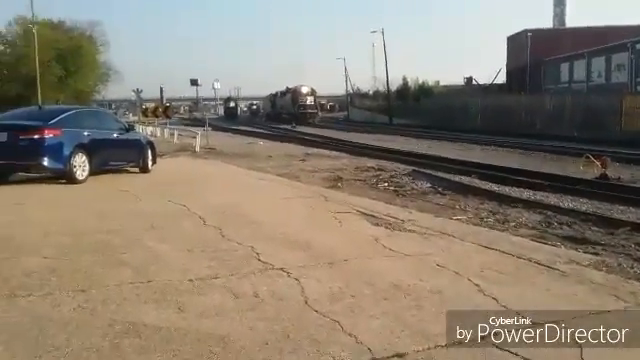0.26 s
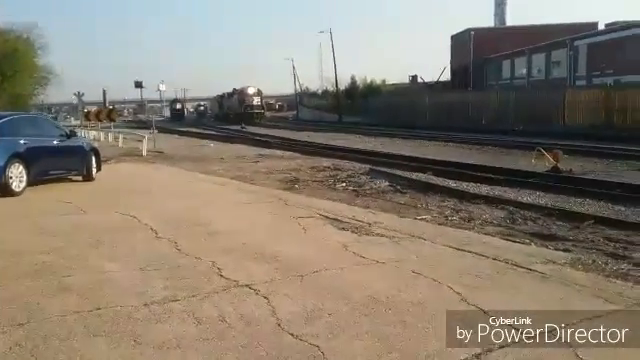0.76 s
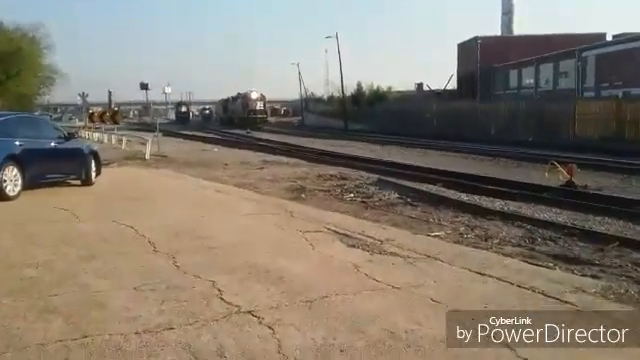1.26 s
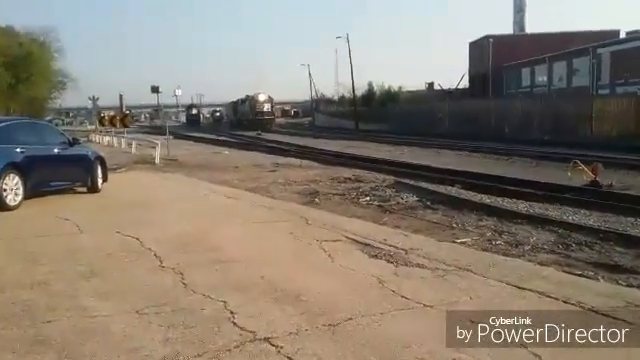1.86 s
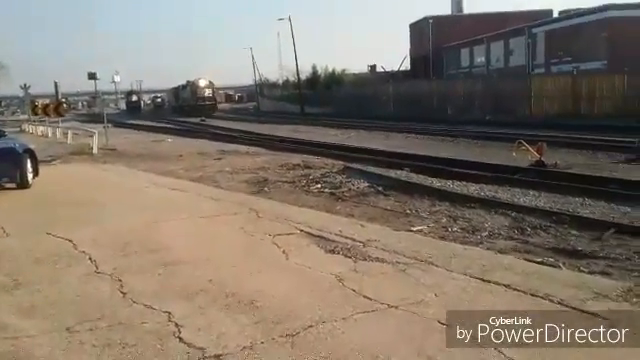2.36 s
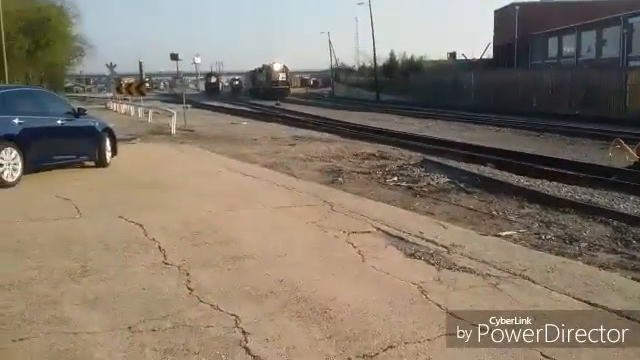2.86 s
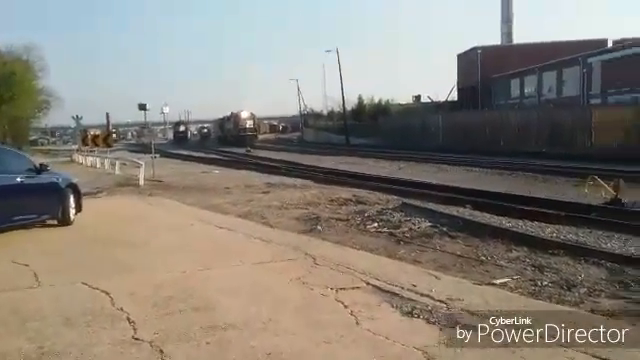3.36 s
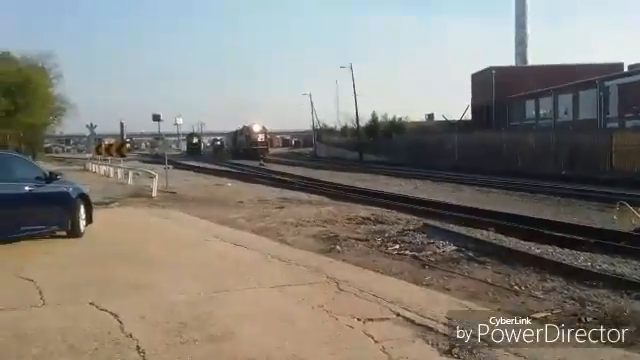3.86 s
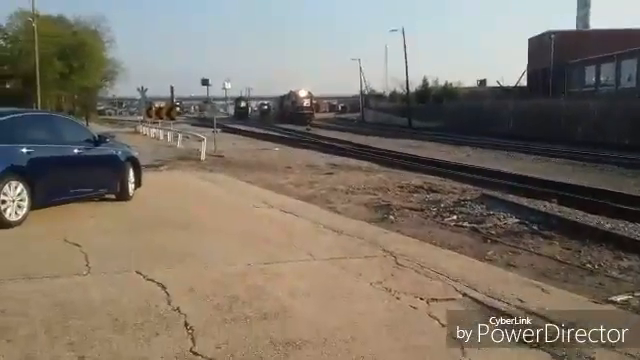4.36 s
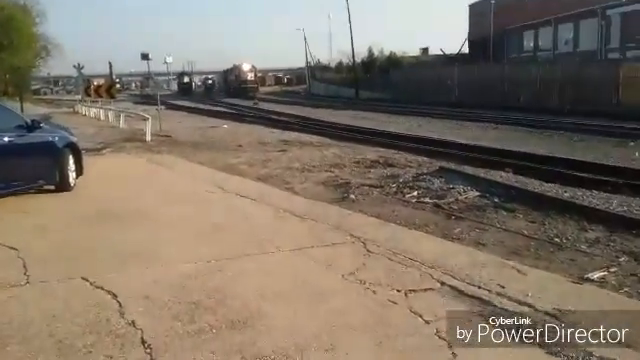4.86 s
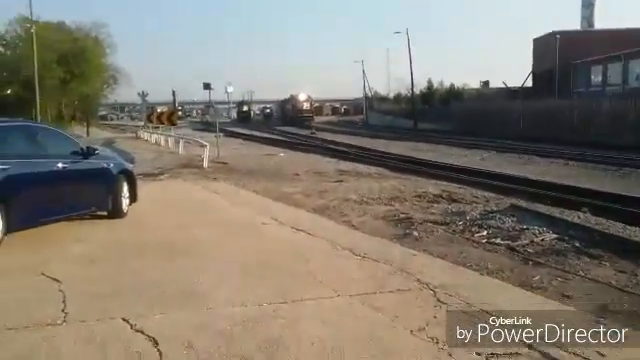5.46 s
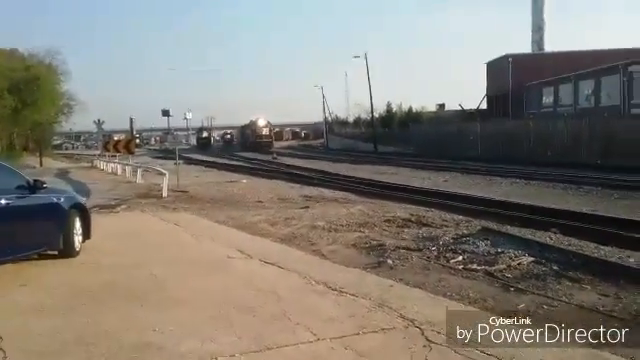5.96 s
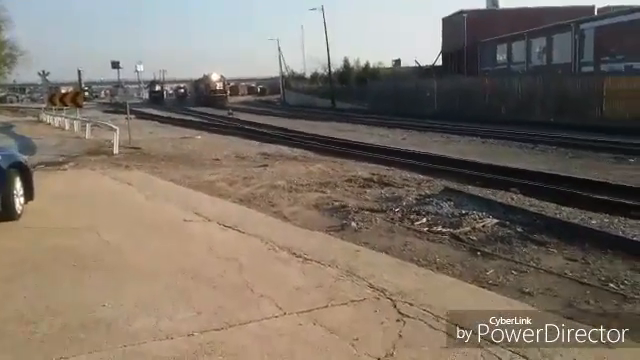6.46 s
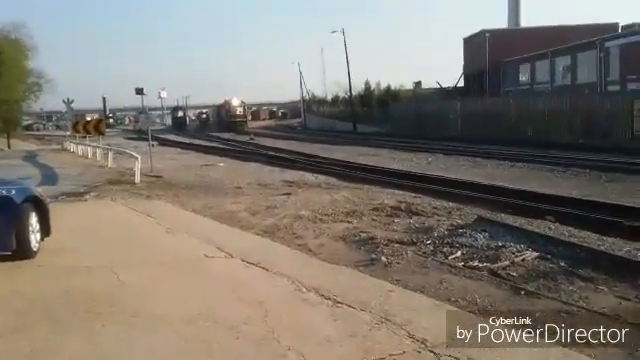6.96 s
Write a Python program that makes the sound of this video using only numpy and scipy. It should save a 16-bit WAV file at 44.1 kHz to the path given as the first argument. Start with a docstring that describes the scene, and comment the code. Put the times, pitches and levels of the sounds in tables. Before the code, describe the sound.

Diesel locomotives idle some way off in an open rail yard, a low drone with a slow throb, a soft fan roar and thin high whining tones that drift on the breeze. A faint wheel squeal dies away at the start. Close by, wind rumbles and slaps at a small microphone, hardest in the first two seconds, then in lighter scattered gusts as the engines carry on.

```python
"""An open rail yard in a light wind, with diesel locomotives idling some way off.
Two neighbouring exhaust tones beat into a slow throb. Turbochargers whistle, a blower and gears whine,
and fans roar, their treble coming and going on the breeze. Close by, gusts rumble and eddies slap
at the port of a small microphone. A faint wheel squeal dies away at the start."""
import sys
import numpy as np
from scipy import signal
from scipy.io import wavfile

SR = 44100
rng = np.random.default_rng(int(sys.argv[2]) if len(sys.argv) > 2 else 0)


def file_out(sig):
    """Save sig as 16-bit WAV at sys.argv[1]."""
    # one column per channel
    cols = np.atleast_2d(sig).T
    # limit, then scale
    lim = np.clip(cols, -1, 1)
    pcm = np.round(lim * 32767).astype(np.int16)
    wavfile.write(sys.argv[1], SR, pcm)


N = 318402
TIME = np.arange(N) / SR
CRANK_HZ = 8.392   # crankshaft turns per second


# The exhaust boom, fading in and out through the moving air.
# Each row: time in seconds, level in dB of the tone at 8 times the crank rate, and of the one at 9 times.
BOOM_LEVELS = [(0.0, -14.5, -32.0), (0.6, -14.0, -27.5), (1.05, -17.7, -23), (1.75, -36, -21.3),
               (2.4, -19.3, -23.2), (3.15, -14.7, -21.6), (3.85, -15.9, -22.6), (4.7, -24.2, -25.5),
               (5.05, -22.4, -28.5), (5.8, -18.4, -23.7), (6.3, -19.8, -20), (6.65, -23, -21.5),
               (7.22, -24, -23)]
# The weaker tones that fill out the drone. Each row: multiple of the crank rate, level in dB.
DRONE_TONES = [(7, -36.5), (10, -35), (11, -28), (15, -40), (16, -39), (18, -41), (20, -32.5), (21, -36.5),
               (22, -30), (23, -42), (24, -32.5)]
# Their shared swell. Each row: time in seconds, gain in dB.
DRONE_SWELL = [(0, 1), (1.2, 1), (2.4, 1), (3.5, -0.5), (4.4, 0.5), (5.2, -1), (5.8, -6.5), (6.5, 0),
               (7.22, -4.5)]

def engine(throb_at_s=0.068, silencer_hz=88, hunt_rad=0.02, waver_rad=0.3, fade_db=2.0):
    """Exhaust tones at multiples of the crank rate; the eighth and ninth beat once a turn."""
    # the crank hunts a little, moving all the tones together
    crank = 2 * np.pi * CRANK_HZ * (TIME - throb_at_s) + hunt_rad * drift(0.6)
    eighth_db, ninth_db = curves(BOOM_LEVELS)
    drone_db, = curves(DRONE_SWELL)
    exhaust = from_db(eighth_db) * np.cos(8 * crank) + from_db(ninth_db) * np.cos(9 * crank)
    for multiple, level_db in DRONE_TONES:
        # tones above the silencer's resonance lag by a third of a cycle
        lag = 2 * np.pi / 3 * (multiple * CRANK_HZ > silencer_hz)
        phase = multiple * crank - lag + waver_rad * drift(0.76)
        exhaust += from_db(level_db + drone_db + fade_db * drift(1.0)) * np.cos(phase)
    return np.sqrt(2) * exhaust


# The turbochargers flaring up. Each row: centre in seconds, half length in seconds,
# then the gain in dB for the whistle, for the whine and for the whine's octave.
TURBO_FLARES = [(0.473, 0.028, 5.5, -5, 3.3), (0.68, 0.32, 0, 7, 5.6), (1.193, 0.15, 0.5, 7.5, 3.5),
                (2.64, 0.15, 5, 0, 1), (4.344, 0.087, 1.5, 3.5, 3), (4.867, 0.049, 7.5, 4.5, 4),
                (5.322, 0.16, -2.5, 3, 5.5), (5.533, 0.096, 6.5, 7, 4.3), (5.87, 0.2, 2, 7.5, 1.5),
                (6.146, 0.1, 0, -3, 4.7), (6.4, 0.26, 2.5, 1, 2)]

def flares():
    """Three curves in dB that ride the whistle, the whine and its octave as the turbochargers flare."""
    return sum(np.outer(gains_db, bump(at_s, half_s)) for at_s, half_s, *gains_db in TURBO_FLARES)


# The turbochargers' whine. Each row: pitch in Hz, width in Hz, relative level in dB.
WHINE_TONES = [(2357, 9, -6), (2369, 9, -3), (2375, 45, -7)]
# A breathier layer about an octave up. Each row: pitch in Hz, width in Hz, relative level in dB.
OCTAVE_TONES = [(4507, 18, -14), (4587, 30, -7.5), (4655, 22, -4.5), (4690, 120, -5)]

def turbo_whine():
    """The turbochargers hold their pitch while their loudness flares and drifts."""
    _, whine_db, octave_db = flares()
    whine = from_db(whine_db + 0.4 * drift(16)) * narrow_tones(WHINE_TONES, steady=0.41)
    octave = from_db(octave_db) * narrow_tones(OCTAVE_TONES, steady=0.075)
    return carried(-52.5, share=0.45) * whine + carried(-54.5, share=0.94) * octave


# The airy top of the turbochargers. Each row: pitch in Hz, width in Hz, relative level in dB.
WHISTLE_TONES = [(6630, 410, -8.5), (7070, 170, -1.5), (7100, 210, -4.5)]

def turbo_whistle(flicker_db=1.5, pulse_db=0.8):
    """A blurred high whistle that flares, flickers and pulses with the exhaust, three times a turn."""
    flare_db, _, _ = flares()
    pulse = np.cos(2 * np.pi * 3 * CRANK_HZ * TIME)
    whistle = low_pass(narrow_tones(WHISTLE_TONES, steady=0), hz=7180, order=16)
    movement = from_db(flare_db + flicker_db * drift(60) - pulse_db * pulse)
    return carried(-42.5, share=1) * movement * whistle


# The body of the fan roar. Each row: frequency in Hz, relative noise density in dB.
ROAR_SPECTRUM = [(200, 5.5), (450, 3), (650, 1.5), (850, -0.5), (1100, -1), (1400, -3), (1800, -5.5),
                 (2350, -18.5), (2800, -13), (4000, -26)]
# The air hiss on top. Each row: frequency in Hz, relative noise density in dB.
HISS_SPECTRUM = [(1500, -5), (2300, 7.5), (2700, 2), (3300, 0.5), (4000, 6.5), (5200, 0.5), (6400, -3.5),
                 (7200, -9), (7800, -12), (9000, -38.5), (11000, -31), (15000, -33.5)]

def fans():
    """Fans roar and air hisses; the hiss lifts slightly when the turbochargers flare."""
    roar = coloured_noise(ROAR_SPECTRUM, flicker_db=2.0, flicker_hz=4.2)
    air = coloured_noise(HISS_SPECTRUM, flicker_db=1.7, flicker_hz=5.1)
    hiss = low_pass(air, hz=7020, order=8) + from_db(-5.5) * air
    _, _, octave_db = flares()
    lift = from_db(0.13 * octave_db)
    return carried(-36, share=0.49) * roar + carried(-43.5, share=0.94) * lift * hiss


# The blower's tight cluster of tones. Each row: pitch in Hz, width in Hz, relative level in dB.
BLOWER_TONES = [(1326.5, 6, -3.5), (1338, 6, -6), (1335, 45, -9)]
# Its rise and fall. Each row: time in seconds, gain in dB.
BLOWER_LEVELS = [(0, 3), (0.2, 5), (0.8, 3), (1.1, -3), (1.5, 3), (1.75, -4), (2.3, 3), (2.75, -0.5),
                 (3.4, 2), (3.95, 0.5), (4.5, 0), (5.55, 0.5), (6.0, -2), (6.5, -2.5), (6.8, 1), (7.22, -1)]

def blower(level_db=-45.5):
    """A blower whines at one pitch, swelling and fading."""
    swell_db, = curves(BLOWER_LEVELS)
    return from_db(level_db + swell_db + 0.4 * drift(16)) * narrow_tones(BLOWER_TONES, steady=0.41)


# The gears' midrange tones. Each row: pitch in Hz, width in Hz, level in dB before the overall gain.
GEAR_TONES = [(663, 7, -47.5), (949, 12, -58), (1519, 7, -59.5), (1990, 14, -55)]

def gears():
    """Gears sing thinly, almost untouched by the breeze."""
    return carried(1.1, share=-0.064) * narrow_tones(GEAR_TONES, steady=0.45)


# The wind at the microphone port between gusts. Each row: time in seconds, strength in dB.
WIND_STRENGTH = [(0, -1), (1.0, -0.5), (1.5, 0), (1.95, 4), (2.2, -2.5), (2.9, -1), (3.5, 3.5), (3.85, 0),
                 (4.5, -1.5), (5.4, 1.5), (6.0, -2.5), (7.22, -1.5)]
# The gusts on top of it. Each row: centre in seconds, half length in seconds, strength in dB.
WIND_GUSTS = [(0.487, 0.072, 1), (0.969, 0.029, 7), (1.066, 0.038, 7), (1.24, 0.12, 4), (1.445, 0.11, 5),
              (1.628, 0.019, 8.5), (1.92, 0.061, 1), (3.578, 0.015, 5.5), (4.183, 0.09, 2),
              (4.368, 0.037, 2), (4.734, 0.048, 3), (5.092, 0.027, 4.5), (7.16, 0.014, 5)]
# The wind's low end. Each row: frequency in Hz, relative noise density in dB.
RUMBLE_SPECTRUM = [(25, -20.5), (40, -21.5), (52, -5), (65, -5.5), (90, 0), (130, -2.5), (190, -6),
                   (250, -10.5), (340, -30.5), (500, -44.5)]
# Its flapping low mids. Each row: frequency in Hz, relative noise density in dB.
FLUTTER_SPECTRUM = [(150, -13), (230, 5), (320, 5), (400, -16), (500, -7), (700, -23), (1100, -47.5)]

def gusts(rumble_db=-22.5, flutter_db=-37, unrest_db=1.8, lumpy_db=3.0):
    """Turbulence at the port: a low rumble, and a brighter flutter that comes in lumps."""
    wind_db, = curves(WIND_STRENGTH)
    breeze = from_db(wind_db + unrest_db * drift(6.5))
    gust_power = sum((from_db(db) * bump(at_s, half_s)) ** 2 for at_s, half_s, db in WIND_GUSTS)
    wind = np.sqrt(breeze ** 2 + gust_power)
    rumble = from_db(rumble_db) * wind * coloured_noise(RUMBLE_SPECTRUM, flicker_db=2.0, flicker_hz=18)
    lumps = from_db(flutter_db + lumpy_db * drift(25)) * wind ** 2.4   # grows faster than the rumble
    flutter = lumps * coloured_noise(FLUTTER_SPECTRUM, flicker_db=1.0, flicker_hz=40)
    return low_pass(rumble, hz=420, order=4) + low_pass(flutter, hz=890, order=4)


# The hardest slaps of air on the port.
# Each row: centre in seconds, level in dB, pitch in Hz, half length in cycles.
STRONG_EDDIES = [(0.375, -15.5, 390, .45), (0.439, -11.5, 334, 0.57), (0.462, -18, 396, .45),
                 (0.506, -8.5, 407, 0.52), (0.524, -12, 347, 0.43), (0.794, -18, 380, .55),
                 (0.805, -14.5, 336, 0.62), (0.950, -24, 325, 0.73), (0.974, -8, 424, 0.49),
                 (1.041, -16, 365, 0.54), (1.069, -10, 373, .45), (1.185, -14.5, 320, 0.81),
                 (1.239, -9.5, 342, 0.49), (1.322, -18.5, 387, .6), (1.357, -14.5, 445, .5),
                 (1.372, -13, 700, 0.57), (1.402, -10, 560, 0.32), (1.416, -11.5, 352, 0.7),
                 (1.439, -8, 330, 0.62), (1.482, -13, 440, 0.18), (1.492, -13, 300, 0.44),
                 (1.519, -13, 400, 0.53), (1.528, -17, 455, 0.44), (1.622, -9.5, 320, 0.46),
                 (1.637, -17, 420, 0.26), (1.788, -26, 326, 0.97), (1.891, -10.5, 332, 1.7),
                 (1.958, -20, 411, 0.41), (1.975, -17.5, 400, .6), (2.003, -17.5, 433, 0.46),
                 (2.168, -15, 348, 0.33), (2.544, -17, 328, 0.89), (3.478, -14.5, 342, 0.34),
                 (3.565, -15, 380, 0.36), (3.659, -16, 340, 0.48), (3.691, -17.5, 363, .6),
                 (3.896, -12.5, 291, 0.83), (3.928, -19, 352, .55), (4.206, -10, 400, 0.31),
                 (4.363, -17, 527, 0.41), (4.377, -19.5, 360, 0.58), (4.657, -20, 338, 0.78),
                 (4.743, -10.5, 317, 0.41), (4.752, -14.5, 345, 0.93), (4.895, -15.5, 327, 0.49),
                 (5.059, -16, 376, .5), (5.080, -22.5, 355, 1), (5.116, -17, 395, 0.4),
                 (5.241, -21, 344, 1.1), (5.648, -15, 393, 0.36), (6.069, -17.5, 335, 0.37),
                 (6.635, -24, 310, 1.2), (7.171, -24, 332, 0.97)]
# The ragged noise around each slap. Each row: frequency in Hz, relative noise density in dB.
WAKE_SPECTRUM = [(300, 9.5), (500, -3.5), (700, -7), (900, -12), (1200, -26.5)]

def eddies(push_db=-10, wake_db=-19.5, wake_half_s=0.0035):
    """Each eddy is a brief pressure swing, riding on a slower push and breaking into a ragged wake."""
    slaps, wake = np.zeros(N), np.zeros(N)
    rows = list(STRONG_EDDIES) + small_eddies()
    for (at_s, level_db, hz, half_cycles), turn in zip(rows, rng.random(len(rows))):
        near = slice(max(0, int((at_s - 0.03) * SR)), int((at_s + 0.03) * SR))
        offset_s = TIME[near] - at_s
        swell = 1 / np.cosh(np.clip(offset_s * hz / half_cycles, -20, 20))
        phase = 2 * np.pi * (offset_s * hz + turn)
        push = from_db(push_db) * np.cos(phase / 2)
        slaps[near] += from_db(level_db) * swell * (np.cos(phase) + push)
        wake[near] += from_db(level_db + wake_db) * np.exp(-(offset_s / wake_half_s) ** 2)
    return slaps + wake * coloured_noise(WAKE_SPECTRUM, flicker_db=3.0, flicker_hz=6.3)


def small_eddies(base_per_s=3.3, base_db=-27.5, hz=345, pitch_spread=0.063, half_cycles=0.4):
    """Rows for weaker eddies that come at random, more often and harder in a stronger wind."""
    wind_db, = curves(WIND_STRENGTH)
    arrivals = np.flatnonzero(rng.random(N) < base_per_s * from_db(wind_db) / SR)
    return [(TIME[i], base_db + wind_db[i], hz * np.exp(pitch_spread * detune), half_cycles)
            for i, detune in zip(arrivals, rng.standard_normal(N))]


# The wheel's ringing modes. Each row: pitch in Hz, width in Hz, starting level in dB.
WHEEL_MODES = [(3210, 15, -56), (3343, 25, -45), (4118, 12, -50), (4125, 70, -49.5), (5626, 14, -54),
               (5900, 25, -50), (8210, 10, -66), (10300, 60, -71), (11770, 25, -70), (12650, 60, -73)]
# The bright scrape under the squeal. Each row: frequency in Hz, relative noise density in dB.
SCRAPE_SPECTRUM = [(3000, -8), (4200, -1), (6000, 9), (8300, -4), (10000, -23.5), (12500, -25),
                   (15000, -27)]

def wheel_squeal(ring_t60_s=2.9, scrape_t60_s=1.3, scrape_db=-40, flicker_db=2.0):
    """Wheel modes ring out, each flickering as the flange catches and slips; the scrape dies sooner."""
    modes = sum(from_db(-flicker_db * drift(25)) * narrow_tones([mode], steady=0.81)
                for mode in WHEEL_MODES)
    ring = from_db(-60 * TIME / ring_t60_s) * modes
    scrape = coloured_noise(SCRAPE_SPECTRUM, flicker_db=3.5, flicker_hz=70)
    return ring + from_db(scrape_db - 60 * TIME / scrape_t60_s) * scrape


def chirp(at_s=1.855, half_s=0.018, level_db=-68, hz=9900, width_hz=250):
    """One tiny, high, blurred chirp."""
    return bump(at_s, half_s) * narrow_tones([(hz, width_hz, level_db)], steady=0)


# The tick's thin colour. Each row: frequency in Hz, relative noise density in dB.
TICK_SPECTRUM = [(4000, -9), (6000, -2), (8500, -10), (11000, -17), (14000, -24)]

def tick(at_s=1.11, half_s=0.004, level_db=-51):
    """One faint, dry tick: a few milliseconds of treble noise."""
    return from_db(level_db) * bump(at_s, half_s) * coloured_noise(TICK_SPECTRUM)


def microphone_hiss(level_db=-70.5):
    """The microphone's own even hiss."""
    return from_db(level_db) * rng.standard_normal(N)


# How well the breeze carries the treble across the yard. Each row: time in seconds, gain in dB.
BREEZE_CARRY = [(0, 6.5), (0.5, 5.5), (0.95, 2), (1.4, 2.5), (1.95, 0.5), (2.55, 1.5), (2.85, 0.5),
                (3.2, 0.5), (3.85, -4.5), (4.35, -2.5), (4.7, -3.5), (4.9, 0), (5.3, 2.5), (5.75, 0),
                (6.1, -1.5), (6.7, -6), (7.22, -6)]

def carried(level_db, share):
    """Gain of a far source: its own level plus its share of the breeze's swing."""
    carry_db, = curves(BREEZE_CARRY)
    return from_db(level_db + share * carry_db)


def narrow_tones(rows, steady, blur_hz=18):
    """Tones blurred by turbulence: a steady core, weaker in a wide tone, plus a narrow band of noise."""
    tones = 0
    for hz, width_hz, level_db in rows:
        core_share = steady / (1 + (width_hz / blur_hz) ** 2)
        phase = 2 * np.pi * (hz * TIME + rng.random())
        core = np.sqrt(2 * core_share) * np.cos(phase)
        blur = drift(0.75 * width_hz) * np.cos(phase) + drift(0.75 * width_hz) * np.sin(phase)
        tones += from_db(level_db) * (core + np.sqrt(1 - core_share) * blur)
    return tones


def coloured_noise(spectrum, flicker_db=0, flicker_hz=20):
    """Third-octave bands of noise, each with its own level and flicker; rms 1."""
    hz, level_db = np.transpose(spectrum)
    edges = 20 * 2 ** (np.arange(30) / 3)
    white, noise = rng.standard_normal((2, N)), 0
    for k, (low, high) in enumerate(zip(edges, edges[1:])):
        centre, flicker = np.sqrt(low * high), drift(flicker_hz)
        if high > hz[0] and low < hz[-1]:
            band_pass = signal.butter(2, [low, high], "band", fs=SR, output="sos")
            band = signal.sosfilt(band_pass, white[k % 2])   # neighbours take independent noise
            band_db = np.interp(np.log(centre), np.log(hz), level_db)
            noise += band * from_db(band_db + flicker_db * flicker)
    return unit_rms(noise)


def drift(rate_hz, step=20, run_in=4000):
    """A smooth random wander with rms about 1: noise through two one-pole low-passes."""
    pole = np.exp(-2 * np.pi * rate_hz * step / SR)
    white = rng.standard_normal(N // step + run_in + 2)
    slow = signal.lfilter([1], [1, -2 * pole, pole * pole], white)[run_in:]
    return np.interp(np.arange(N) / step, np.arange(len(slow)), unit_rms(slow))


def curves(rows):
    """One automation curve for each column after the time, its points joined by straight lines."""
    times_s, *columns = np.transpose(rows)
    return [np.interp(TIME, times_s, column) for column in columns]


def bump(at_s, half_s):
    """A bell-shaped swell of height 1 around a moment."""
    return np.exp(-((TIME - at_s) / half_s) ** 2)


def low_pass(x, hz, order):
    """Butterworth low-pass."""
    return signal.sosfilt(signal.butter(order, hz, fs=SR, output="sos"), x)


def from_db(db):
    """Decibels to gain."""
    return 10 ** (np.asarray(db) / 20)


def unit_rms(x):
    """Scale to an rms of one."""
    return x / np.sqrt(np.mean(x ** 2) + 1e-20)


def scene(port_cut_hz=41):
    """The yard in mono, with the wind close by; the microphone port sheds the wind's deepest rumble."""
    locomotives = engine() + fans() + gears() + blower() + turbo_whine() + turbo_whistle()
    yard = locomotives + wheel_squeal() + chirp() + tick()
    port = signal.butter(2, port_cut_hz, "high", fs=SR, output="sos")
    wind = signal.sosfilt(port, gusts() + eddies())
    return (yard + wind + microphone_hiss())[None]


def record(dry, cutoff_hz=15500):
    """A soft clip rounds the very loudest peaks, then the top is cut steeply."""
    rounded = dry / (1 + dry ** 10) ** (1 / 10)
    return signal.sosfilt(signal.ellip(10, 0.1, 80, cutoff_hz, fs=SR, output="sos"), rounded)


dry = scene()
out = record(dry)
file_out(out)
```